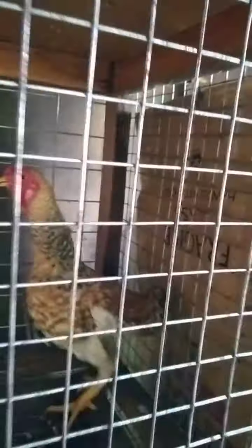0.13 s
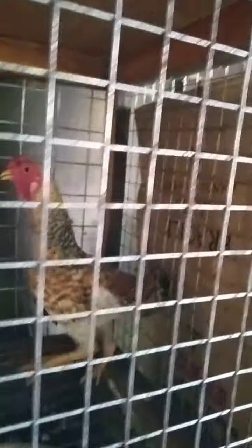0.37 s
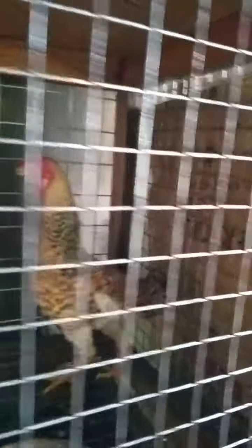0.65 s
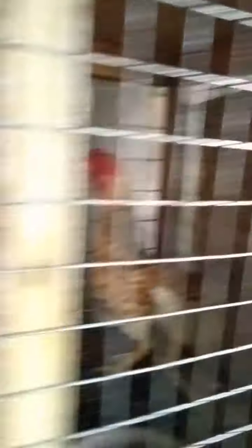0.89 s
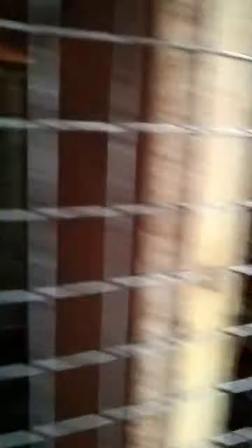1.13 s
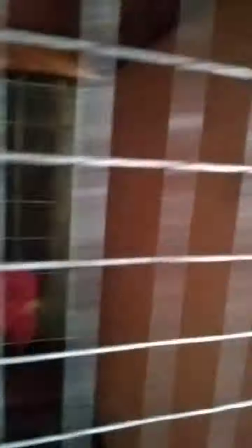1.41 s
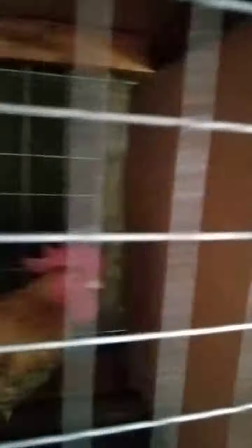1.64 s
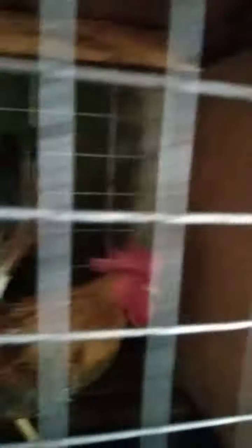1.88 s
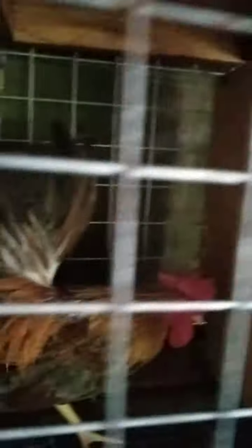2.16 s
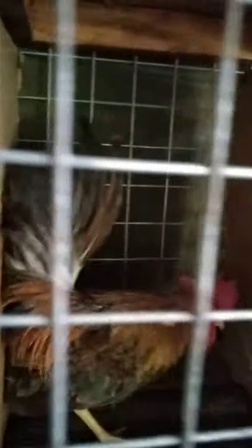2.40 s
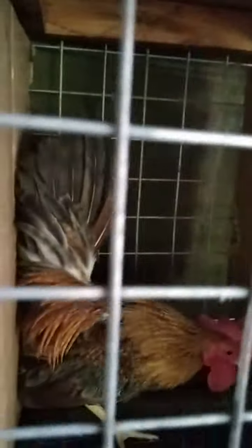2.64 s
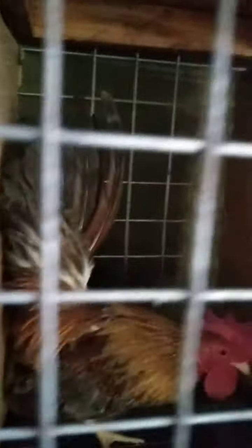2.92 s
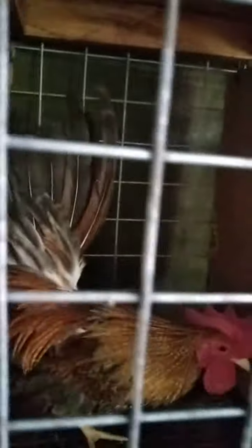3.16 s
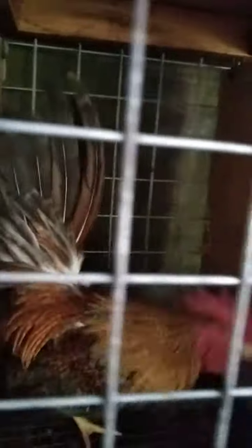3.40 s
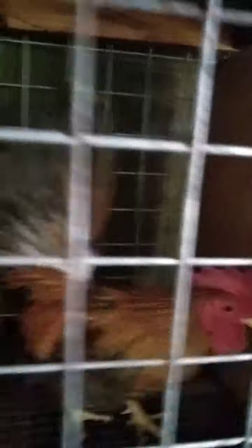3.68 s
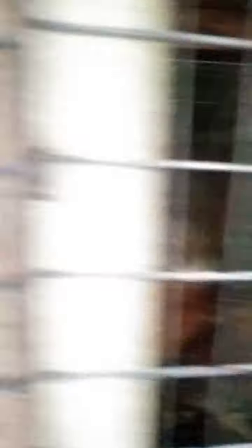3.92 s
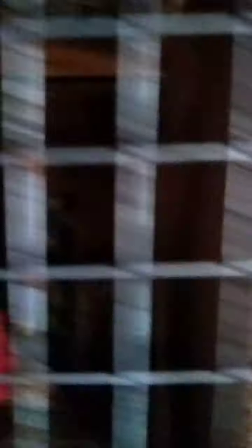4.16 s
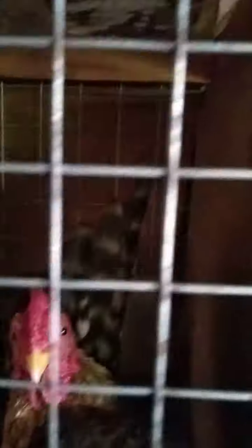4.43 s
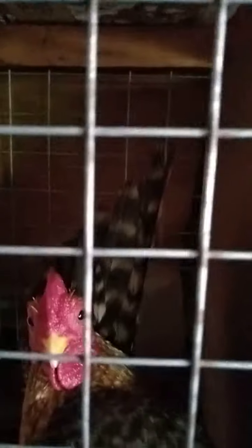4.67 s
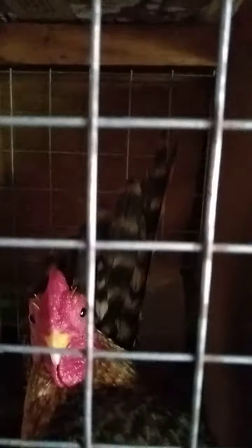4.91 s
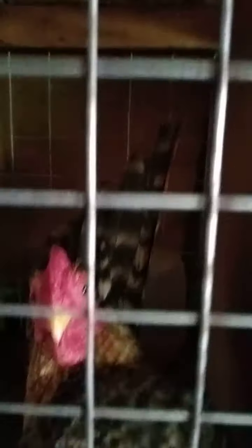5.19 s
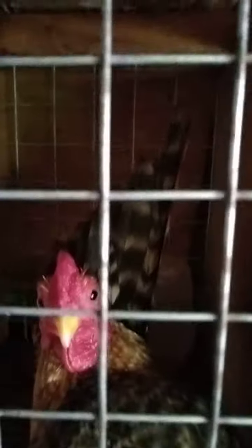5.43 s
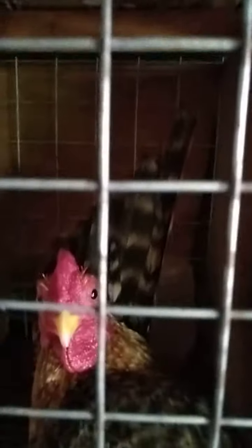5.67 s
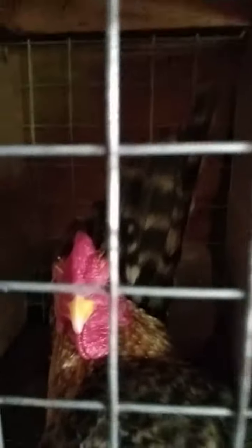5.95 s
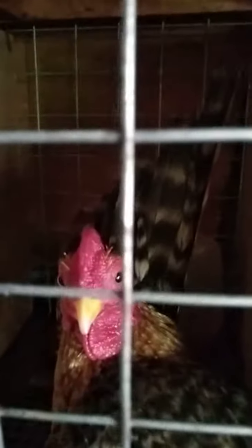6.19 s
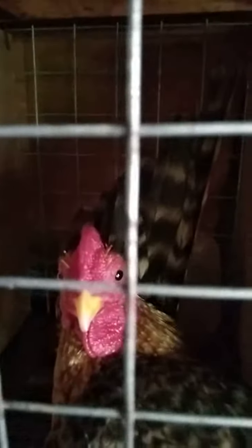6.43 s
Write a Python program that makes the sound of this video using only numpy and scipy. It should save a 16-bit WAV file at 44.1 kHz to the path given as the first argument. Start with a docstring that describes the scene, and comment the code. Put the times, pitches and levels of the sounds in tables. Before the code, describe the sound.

Near hens give short dry clucks and bursts of harsh, cracking squawks over faint distant calls, thin peeps, low rumble and feathery hiss.

```python
"""Caged chickens at night

In a wooden shed, near birds squawk and cluck, clear then hoarse, as overtones of a voice box shaped by
the windpipe and beak, with noise bursts at harsh starts. Duller calls and sliding peeps answer further off;
delays make the echo. A rumble with low tones, a flock murmur and a feathery hiss, all noise, lie underneath."""
import sys
import numpy as np
from scipy import signal
from scipy.io import wavfile
from scipy.ndimage import uniform_filter1d, minimum_filter1d

SR = 44100
rng = np.random.default_rng(int(sys.argv[2]) if len(sys.argv) > 2 else 0)


def inscribe(sig):
    """Save sig as 16-bit PCM at rate SR to the path in sys.argv[1].

    A 1-D sig is mono; a 2-D sig holds one channel per row.
    Samples are clipped to [-1, 1] before scaling.
    """
    pcm = np.round(np.clip(np.atleast_2d(sig).T, -1, 1) * 32767)
    wavfile.write(sys.argv[1], SR, pcm.astype(np.int16))


def gain_from_db(level_db):
    """Turn a decibel level (scalar or array-like) into a linear amplitude factor."""
    decades = np.asarray(level_db, float) / 20
    return 10 ** decades


N = 289715
CUTOFF_HZ = 8512   # no overtone is made above this

# How the voice box vibrates in each kind of voice. Each entry: basic hoarseness from 0 to 1,
# power from 0 to 1 of the extra overtones halfway between the usual ones (every second pulse differs).
VOICING = {"clear": (.03, 0), "rise": (.05, 0), "split": (.12, .7), "husky": (.2, .05), "screech": (.6, 0),
           "rasp": (.65, .15), "hoarse": (.85, 0), "harsh": (1, 0)}


def rms_one(x):
    """Scale to unit power."""
    return x / np.sqrt(np.mean(np.abs(x) ** 2) + 1e-20)


def wobble(hz, size, count=1):
    """Rows of slow noise with a spread of 1: white noise smoothed twice."""
    r = np.exp(-2 * np.pi * hz / SR)
    run_in = int(SR / hz)
    white = rng.standard_normal((count, size + run_in))
    slow = signal.lfilter([1], [1, -2 * r, r * r], white)[:, run_in:]
    return slow * np.sqrt((1 - r * r) ** 3 / (1 + r * r))


def in_time(rows, edge_s=.005, arched=True):
    """Sample indices of a note, its soft-edged gate and its columns, as smooth arches or straight lines."""
    s, *columns = np.transpose(rows)
    first = max(int((s[0] - edge_s / 2) * SR), 0)
    at = np.arange(first, min(int((s[-1] + edge_s / 2) * SR), N))
    ramp = np.clip(np.minimum(at - at[0], at[-1] - at) / (edge_s * SR), 0, 1)
    gate = np.sin(ramp * np.pi / 2)
    t = np.clip(at / SR, s[0], s[-1]) - s[0]
    if not arched:
        return at, gate, [np.interp(t, s - s[0], c) for c in columns]
    return at, gate, [np.polyval(np.polyfit(s - s[0], c, len(s) - 1), t) for c in columns]


def note(rows, throat, hoarse, halved, low_db, treble_db, arched=True):
    """Overtones of the pulse rate through the throat; hoarseness smears each overtone into noise."""
    blur_hz, throb_hz, jitter_hz, unsteady_hz = 110, 110, 41, 250   # speeds of the random wobbles
    jitter, hoarse_jitter = 0.0053, .032   # pitch spread as a share: in any voice, more if fully hoarse
    uneven_db = 2.5   # chance spread of the overtone strengths
    at, gate, (pitch, level_db) = in_time(rows, arched=arched)
    order = np.arange(1, 33)[:, None] / 2   # whole overtones and those halfway between
    hz = order * pitch
    throb = 0.38 * hoarse

    # hoarse pulses come unevenly
    unsteady = hoarse_jitter * hoarse * wobble(unsteady_hz, len(at))[0]
    # weak ends vibrate unevenly, and high overtones blur first
    weak = ((level_db.max() - level_db) / 12) ** 2
    hoarse = np.clip(hoarse + weak + .35 * (hz / 8000) ** 2, 0, 1)
    hoarse = hoarse * np.where(order == 1, .4, 1)   # the fundamental stays firm

    power = sum(gain_from_db(2 * db) / (1 + (2 * (hz - centre) / width) ** 2) ** 2 for centre, width, db in throat)
    power = power * (order > .5) * (hz < CUTOFF_HZ)
    power = power * np.where(hz < 1200, gain_from_db(2 * low_db), 1)
    power = power * gain_from_db(2 * uneven_db * rng.standard_normal(order.shape))

    # share each overtone between a clear tone and noise
    whole = order % 1 == 0
    clear = np.sqrt((1 - hoarse) * np.where(whole, 1, halved))
    noisy = np.sqrt(hoarse * np.where(whole, 1, .5 * hoarse + halved) / 2)

    # level the overtones below and within the treble separately
    treble = hz > 3650
    weight = power * (clear ** 2 + 2 * noisy ** 2)
    low, high = (weight * ~treble).sum(axis=0), (weight * treble).sum(axis=0)
    gain = np.sqrt(2 * power / np.where(treble, high, low)) * np.where(treble, gain_from_db(treble_db), 1)

    pulse_rate = pitch * (1 + unsteady + jitter * wobble(jitter_hz, len(at))[0])
    phase = 2 * np.pi * np.cumsum(pulse_rate) / SR * order
    phase = phase + .5 * order ** 2   # each resonance delays the overtones above it
    cosine, sine = wobble(blur_hz, len(at), count=2 * len(order)).reshape(2, len(order), -1)
    overtones = (clear + noisy * cosine) * np.cos(phase) + noisy * sine * np.sin(phase)
    sound = (gain * overtones).sum(axis=0)
    beats = np.exp(throb * wobble(throb_hz, len(at))[0] - throb ** 2)   # irregular bursts of pulses
    out = np.zeros(N)
    out[at] = sound * beats * gate * gain_from_db(level_db)
    return out


def near_throat(beak_hz, beak_db, upper_db):
    """The windpipe's resonances, with the beak and upper resonances of the moment."""
    # Windpipe resonances of near birds. Each row: centre in Hz, width in Hz, strength in dB.
    windpipe = [(1110, 210, 6.5), (1740, 1860, -1), (4130, 640, 1), (5593, 1240, -2), (6580, 960, -4),
                (7780, 4200, 2)]
    return windpipe + [(beak_hz, 410, beak_db), (3120, 222, upper_db)]


def squawks():
    """Each part glides to its end pitch and lasts until the next; only the ends of the call swell and die."""
    # Longer calls of near birds. Each row: end in seconds, lift below 1.2 kHz in dB, treble in dB
    # (both added to the colour of the voice), parts. The voice jumps from part to part. Each part: start in
    # seconds, pitch from in Hz, pitch to in Hz, level in dB, open-beak resonance in Hz, kind of voice.
    squawk_calls = [ (0.951, -6.5, -7, [(0.823, 570, 830, -15, 2500, "rise"),
                    (0.878, 1022, 1011, -16.5, 3080, "hoarse")]),
                    (1.244, -2, -4, [(1.115, 617, 850, -15.5, 2960, "rise"),
                    (1.178, 988, 1002, -15, 2950, "hoarse")]),
                    (1.47, -1, -4.5, [(1.4, 613, 833, -15.5, 3370, "rise"),
                    (1.44, 1033, 874, -13.5, 3120, "hoarse")]),
                    (2.34, -6, -4.5, [(1.98, 588, 873, -11.5, 2570, "rise"),
                    (2.03, 671, 687, -14.5, 1340, "husky"), (2.065, 700, 780, -16, 2930, "clear"),
                    (2.11, 862, 945, -5, 2730, "split"), (2.145, 1056, 1020, -14.5, 2443, "rasp"),
                    (2.285, 923, 854, -13, 2580, "split")]),
                    (2.759, -9.5, -5.5, [(2.58, 1117, 1072, -23.5, 2130, "hoarse"),
                    (2.62, 949, 951, -23.5, 1900, "clear"), (2.72, 945, 910, -20.5, 1780, "hoarse")]),
                    (2.915, 6, -9.5, [(2.84, 863, 720, -24, 1610, "hoarse")]),
                    (2.971, 14, -9, [(2.92, 1230, 1186, -12.5, 1650, "harsh")]),
                    (3.025, -3, -12, [(2.98, 651, 642, -13.5, 2530, "hoarse")]),
                    (3.27, 0, -23, [(3.0, 622.5, 638, -16, 2490, "clear"),
                    (3.11, 634, 624, -15, 2460, "husky"), (3.17, 622, 645, -17.5, 2300, "screech")]),
                    (3.326, -3, -10.5, [(3.268, 1250, 1246, -15, 1610, "harsh")]),
                    (3.575, -7.5, -2.5, [(3.36, 694, 754.4, -4, 2150, "screech")]),
                    (3.952, -3, -3, [(3.56, 644, 850, -20.5, 1620, "rise"),
                    (3.608, 613, 653, -17, 1360, "screech"), (3.635, 700, 850, -17.5, 2710, "clear"),
                    (3.7, 867, 912, -16.5, 2550, "split"), (3.752, 1049, 1040, -16, 2383, "rasp"),
                    (3.862, 942, 938, -18, 2800, "clear"), (3.9, 919, 828, -15, 2750, "split")]),
                    (5.23, -0.5, -22.5, [(5.16, 788, 800, -17, 850, "rasp")]),
                    (5.39, 3, -6.5, [(5.31, 675, 892, -14.5, 2660, "rise"),
                    (5.355, 900, 850, -11, 3140, "hoarse")]),
                    (5.725, 3, -5.5, [(5.4, 1044, 1052, -14, 2800, "rasp"),
                    (5.48, 793, 944, -10.5, 2600, "screech"), (5.512, 1048, 1050, -15.5, 1050, "clear"),
                    (5.562, 1069, 1035, -15, 2524, "rasp"), (5.65, 920.5, 880, -14, 2520, "husky")]), ]
    # Colour of each kind of voice. Each entry: lift below 1.2 kHz in dB, treble in dB,
    # open-beak resonance in dB, upper windpipe resonance in dB.
    voice_colour = {"rise": (1, -2.5, 2, 12), "clear": (-6, 0.5, 8.5, -5.5),
                    "split": (-11.5, 0.5, 8.5, -6.5), "screech": (-13, -1, 11, -18),
                    "rasp": (2.5, -1, 18, -5), "hoarse": (2, -3, 6.5, -13.5), "harsh": (10, 5, 19, -19),
                    "husky": (-5, -6, 16.5, -3)}
    # Shape of the pitch glide for each kind of voice, one number without a unit:
    # below zero it is quick at first and settles, above zero it speeds up late.
    glide_bend = {"rise": -4, "clear": 2.5, "split": 1, "screech": -1, "rasp": .1, "hoarse": .5, "harsh":
                  .1, "husky": .1}
    attack_s, attack_db, release_s, release_db = 0.016, -14.5, 0.027, -18.5
    release_share = 0.067   # longer calls die longer, by this share of their length
    out = np.zeros(N)
    for end, call_low_db, call_treble_db, parts in squawk_calls:
        begin = parts[0][0]
        stops = [part[0] for part in parts[1:]] + [end]
        dying_s = release_s + release_share * (end - begin)
        for (s, from_hz, to_hz, db, beak_hz, voicing), stop in zip(parts, stops):
            low_db, treble_db, beak_db, upper_db = voice_colour[voicing]
            bend = glide_bend[voicing]
            t = np.linspace(s, stop, num=24)
            glide = np.expm1(bend * (t - s) / (stop - s)) / np.expm1(bend)
            pitch = from_hz + (to_hz - from_hz) * glide
            swell = attack_db * np.clip(1 - (t - begin) / attack_s, 0, 1) ** 2
            dying = release_db * np.clip(1 - (end - t) / dying_s, 0, 1) ** 2
            rows = np.transpose([t, pitch, db + swell + dying])
            out += note(rows, near_throat(beak_hz, beak_db, upper_db), *VOICING[voicing],
                        low_db + call_low_db, treble_db + call_treble_db, arched=False)
    return out


def bursts():
    """Air released at once: noise that starts abruptly and dies fast."""
    # Explosive starts of the harshest squawks. Each row: start in seconds, level in dB.
    burst_starts = [(2.923, -24), (3.271, -17), (5.406, -15.5)]
    fade_s = 0.019
    t = np.arange(N) / SR
    shape = sum(gain_from_db(db) * (t >= s) * np.exp(-np.maximum(t - s, 0) / fade_s) for s, db in burst_starts)
    band = signal.butter(2, [1100, 7500], "band", fs=SR, output="sos")
    return shape * rms_one(signal.sosfilt(band, rng.standard_normal(N)))


def clucks():
    """Short calls whose pitch and level rise and fall together in one arch."""
    # Clucks of near birds. Each row: start in seconds, length in seconds, pitch halfway in Hz,
    # level halfway in dB, open-beak resonance in Hz, kind of voice.
    cluck_calls = [(0.046, 0.064, 913, -14.5, 1920, "clear"), (0.308, 0.062, 874, -14.5, 1740, "clear"),
                   (0.578, 0.062, 840, -13.5, 1940, "clear"), (1.695, 0.073, 811, -12, 3280, "rise"),
                   (3.301, 0.063, 790, -14.5, 1530, "clear"), (4.146, 0.069, 901, -16.5, 2750, "clear"),
                   (4.461, 0.065, 822, -14.5, 2900, "screech"), (4.761, 0.07, 803, -14, 3180, "husky"),
                   (4.999, 0.075, 841, -12, 3270, "husky"), (5.924, 0.064, 889, -15, 2650, "husky"),
                   (6.261, 0.067, 771, -14, 3520, "husky")]
    # Colour of every cluck, one row: lift below 1.2 kHz in dB, treble in dB,
    # open-beak resonance in dB, upper windpipe resonance in dB.
    cluck_colour = (-3.5, -9.5, 3, 5.5)
    start_share, end_share, ends_db = 0.73, 0.6, -12   # pitch and level of the ends against halfway
    low_db, treble_db, beak_db, upper_db = cluck_colour
    out = np.zeros(N)
    for s, length, hz, db, beak_hz, voicing in cluck_calls:
        rows = [(s, start_share * hz, db + ends_db), (s + length / 2, hz, db),
                (s + length, end_share * hz, db + ends_db)]
        throat = near_throat(beak_hz, beak_db, upper_db)
        out += note(rows, throat, *VOICING[voicing], low_db, treble_db)
    return out


def far_birds():
    """Calls of steady pitch through the cage walls that swell and fade."""
    # Birds in other cages. Each row: start in seconds, length in seconds, pitch in Hz, level in dB,
    # kind of voice.
    far_calls = [(0.252, 0.069, 670, -39, "husky"), (0.458, 0.089, 878, -31.5, "screech"),
                 (0.719, 0.07, 700, -33, "screech"), (0.937, 0.08, 652, -32, "screech"),
                 (1.05, 0.08, 797, -42, "husky"), (1.345, 0.059, 690, -28, "husky"),
                 (1.463, 0.054, 778, -36.5, "husky"), (1.563, 0.08, 767, -25.5, "screech"),
                 (1.793, 0.067, 736, -28, "screech"), (1.929, 0.06, 799, -41, "clear"),
                 (2.423, 0.048, 931, -35.5, "screech"), (2.488, 0.043, 894, -42.5, "screech"),
                 (4.009, 0.054, 900, -37.5, "screech"), (4.212, 0.056, 872, -32.5, "screech"),
                 (4.702, 0.069, 895, -24.5, "hoarse"), (4.89, 0.11, 824, -40, "husky"),
                 (6.081, 0.032, 638, -39.5, "hoarse"), (6.409, 0.077, 649, -34, "husky"),
                 (6.461, 0.047, 829, -35, "husky"), (6.514, 0.055, 586, -33, "clear")]
    # Windpipe resonances as heard through the cage walls. Each row: centre in Hz, width in Hz, strength in dB.
    muffled_throat = [(850, 950, 4.5), (1240, 760, -2), (2890, 720, -1), (3270, 100, -18.5),
                      (5940, 970, -9), (6790, 400, -1)]
    peak_share, start_db, end_db = 0.35, -10.5, -10   # where a call is loudest, and its ends against that
    out = np.zeros(N)
    for s, length, hz, db, voicing in far_calls:
        rows = [(s, hz, db + start_db), (s + peak_share * length, hz, db), (s + length, hz, db + end_db)]
        out += note(rows, muffled_throat, VOICING[voicing][0], halved=0.44, low_db=0, treble_db=-17.5,
                    arched=False)
    return out


def peeps():
    """Sines that slide down."""
    # Thin peeps of a young bird. Each row: start in seconds, length in seconds, starting pitch in Hz, level in dB.
    peep_calls = [(1.894, 0.067, 3970, -63), (2.783, 0.031, 3630, -57), (4.562, 0.086, 3560, -50),
                  (4.848, 0.079, 3730, -47)]
    sag_hz_per_s = 5400
    out = np.zeros(N)
    for s, length, hz, db in peep_calls:
        rows = [(s, hz), (s + length, hz - sag_hz_per_s * length)]
        at, gate, (pitch,) = in_time(rows, edge_s=.015)
        out[at] += np.sqrt(2) * gate * gain_from_db(db) * np.sin(2 * np.pi * np.cumsum(pitch) / SR)
    return out


def shed(x):
    """Echo of the shed: ten feedback delays, duller on every round, stepped block by block."""
    t60_s, wall_cut_hz = 0.12, 12000   # time for low tones to die by 60 dB, and where dulling sets in
    out, dull = np.zeros(N), np.exp(-2 * np.pi * wall_cut_hz / SR)
    for k, lag in enumerate((np.geomspace(.009, .031, 10) * SR).astype(int)):
        loop, gain, state = x.copy(), gain_from_db(-60 * lag / SR / t60_s), [0.]
        for i in range(lag, N, lag):
            back, state = signal.lfilter([gain * (1 - dull)], [1, -dull], loop[i - lag:i], zi=state)
            loop[i:i + lag] += back[:N - i]
        out += (loop - x) * (-1) ** k
    return out


def banded_noise(spectrum, patchy_db, flicker_hz):
    """Third-octave bands of noise, each with its own level and flicker; rms 1."""
    points, out = np.array(spectrum), 0
    edges = 20 * 2 ** np.arange(0, 9, 1 / 3)
    white = rng.standard_normal((2, N))
    for k, (low, high) in enumerate(zip(edges, edges[1:])):
        level_db = np.interp(np.log(low * high) / 2, np.log(points[:, 0]), points[:, 1])
        if level_db > -45:   # leave out the faintest bands
            sos = signal.butter(2, [low, high], "band", fs=SR, output="sos")
            band = signal.sosfilt(sos, white[k % 2])
            # one flicker value for every 32 samples, hence the faster rate
            flicker = np.repeat(wobble(flicker_hz * 32, N // 32 + 1)[0], 32)[:N]
            out = out + band * gain_from_db(level_db + patchy_db * flicker)
    return rms_one(out)


def hum():
    """Wavering low tones: noise through narrow resonances."""
    # Tones in the rumble. Each row: pitch in Hz, width in Hz, level in dB against the rumble's noise.
    hum_tones = [(110.3, 12, -5), (168.7, 15, -14), (326, 14, -16.5)]
    out = 0
    for hz, width, db in hum_tones:
        r = np.exp(-np.pi * width / SR)
        feedback = [1, -2 * r * np.cos(2 * np.pi * hz / SR), r * r]
        ringing = signal.lfilter([1, 0, -1], feedback, rng.standard_normal(N + SR))
        out = out + gain_from_db(db) * rms_one(ringing[SR:])   # skip the first second, while it builds up
    return out


def background():
    """Lumpy rumble, blurred voices of the flock and a hiss: flickering noise, each on its own level."""
    # Spectrum of the rumble. Each row: frequency in Hz, relative level in dB per Hz.
    rumble_spectrum = [(15, -75), (25, -34), (49, -33), (107, 8.5), (146, -10.5), (177, -6), (226, -16),
                       (325, -3.5), (371, -23), (450, -13.5), (580, -49.5), (990, -120)]
    # Spectrum of the flock's murmur. Each row: frequency in Hz, relative level in dB per Hz.
    murmur_spectrum = [(240, -27), (400, -11), (897, 2.5), (1410, 6.5), (1560, -26), (2320, 7), (3350, -7),
                       (3790, -40), (4600, -14.5), (5980, -54), (10100, -120)]
    # Spectrum of the feathery hiss. Each row: frequency in Hz, relative level in dB per Hz.
    hiss_spectrum = [(2710, -48.5), (4600, -18.5), (6340, -5.5), (7360, -5), (7920, -9), (8560, -32),
                     (8800, -40), (11400, -70), (19400, -120)]
    # Loudness of the rumble's noise over time. Each row: time in seconds, level in dB.
    rumble_levels = [(0.0, -47), (0.9, -45), (1.04, -38.5), (1.19, -50), (1.22, -43), (1.77, -37),
                     (1.96, -30), (2.12, -51), (2.93, -39.5), (3.16, -46), (3.2, -37), (3.55, -44),
                     (3.58, -42), (3.75, -52.5), (5.27, -27.5), (5.58, -44.5), (6.51, -30), (6.57, -31)]
    # Loudness of murmur and hiss over time. Each row: time in seconds, flock murmur in dB, hiss in dB.
    flock_levels = [(0, -53.5, -56), (.2, -59.5, -59.5), (0.681, -47, -49.5), (1.2, -50.5, -49),
                    (1.55, -46, -54), (2.38, -51, -54), (2.55, -48, -71), (2.799, -45.5, -48.5),
                    (3.25, -32.5, -70), (3.981, -46, -49), (4.12, -50, -66), (4.43, -49.5, -54),
                    (4.9, -36.5, -44), (5.281, -33, -41), (5.95, -43, -53), (6.2, -40, -35.5),
                    (6.36, -31.5, -45), (6.57, -40, -50)]
    t = np.arange(N) / SR
    s, murmur_db, hiss_db = np.transpose(flock_levels)
    rumble = banded_noise(rumble_spectrum, patchy_db=3.5, flicker_hz=16) + hum()
    murmur = banded_noise(murmur_spectrum, patchy_db=6.5, flicker_hz=10.5)
    hiss = banded_noise(hiss_spectrum, patchy_db=6.0, flicker_hz=13)
    return (gain_from_db(np.interp(t, *np.transpose(rumble_levels))) * rumble
            + gain_from_db(np.interp(t, s, murmur_db)) * murmur
            + gain_from_db(np.interp(t, s, hiss_db)) * hiss)


def scene():
    """Near birds are nearly dry, far birds carry more of the shed."""
    near_room_db, far_room_db = -18.5, -6.5
    near = clucks() + squawks() + bursts()
    far = far_birds() + peeps()
    echo = shed(gain_from_db(near_room_db) * near + gain_from_db(far_room_db) * far)
    # a small bird radiates almost nothing below its pitch
    low_cut = signal.butter(6, 478, "high", fs=SR, output="sos")
    birds = signal.sosfilt(low_cut, near + far + echo)
    return (birds + background())[None]


def low_pass(x):
    """Removes everything above the highest recorded frequency."""
    return signal.sosfilt(signal.butter(12, 9060, fs=SR, output="sos"), x)


def record(dry):
    """The microphone dips in the lower treble, a fast limiter holds the peaks down, the top is cut steeply."""
    dip_hz, dip_width_hz, dip_db = 4475, 870, -4.5
    limit_db, hold_s = -3.8, 0.002
    peak = signal.lfilter(*signal.iirpeak(dip_hz, dip_hz / dip_width_hz, SR), dry)
    dipped = dry - (1 - gain_from_db(dip_db)) * peak
    hold = int(hold_s * SR)
    allowed = np.minimum(1, gain_from_db(limit_db) / (np.abs(dipped) + 1e-9))
    gain = uniform_filter1d(minimum_filter1d(allowed, 2 * hold), hold)
    top_cut = signal.cheby2(14, 75, CUTOFF_HZ + 400, fs=SR, output="sos")
    return low_pass(signal.sosfilt(top_cut, dipped * gain))


dry = scene()
out = record(dry)
inscribe(out)
```